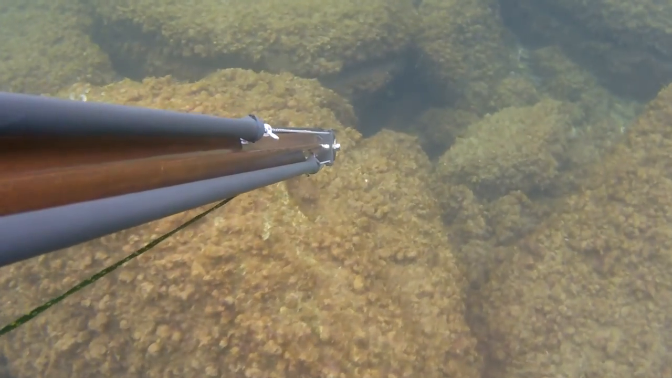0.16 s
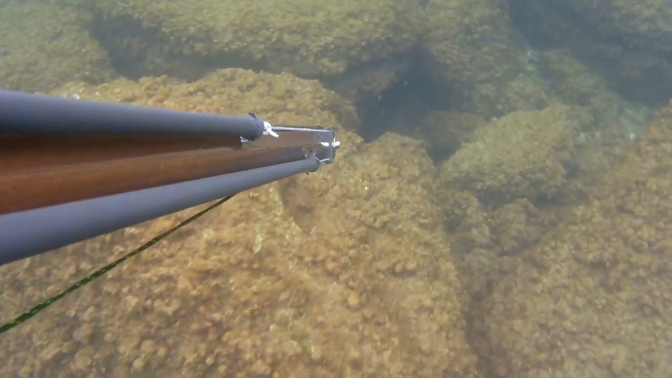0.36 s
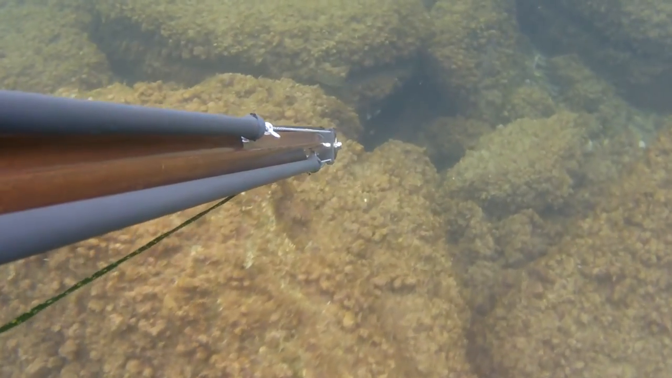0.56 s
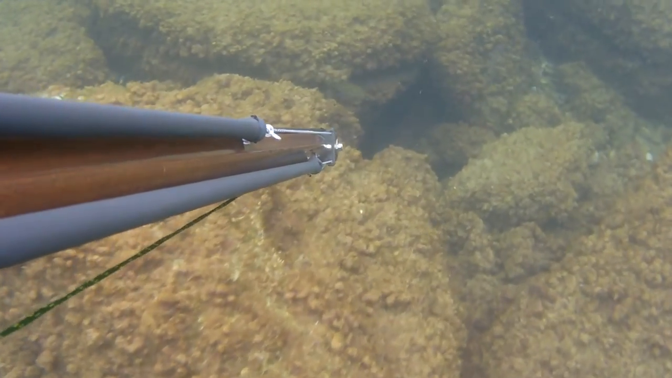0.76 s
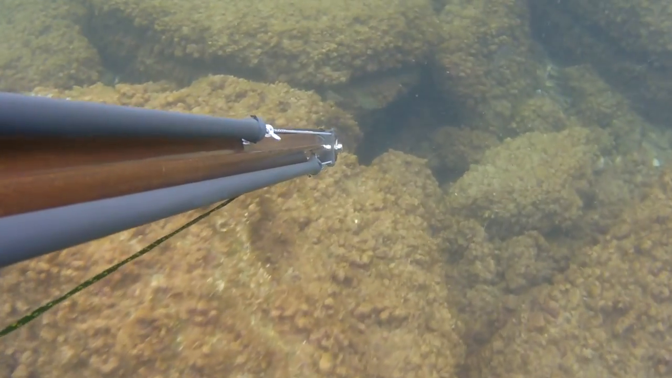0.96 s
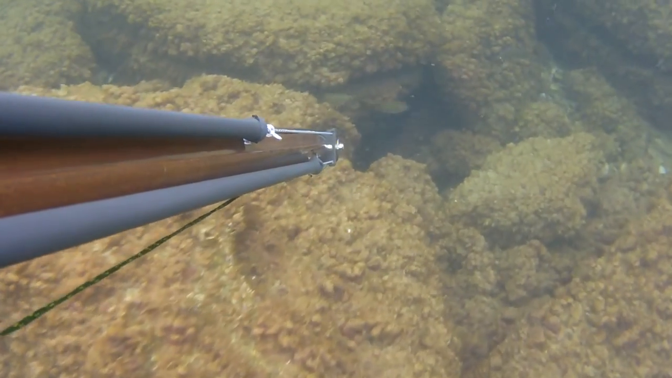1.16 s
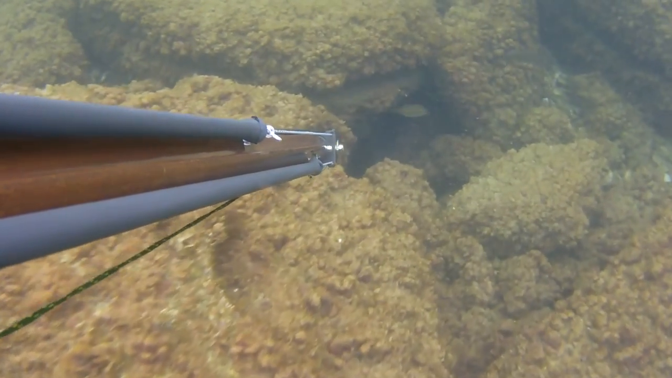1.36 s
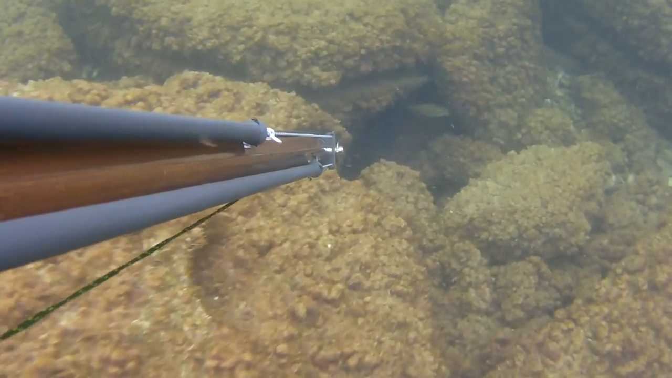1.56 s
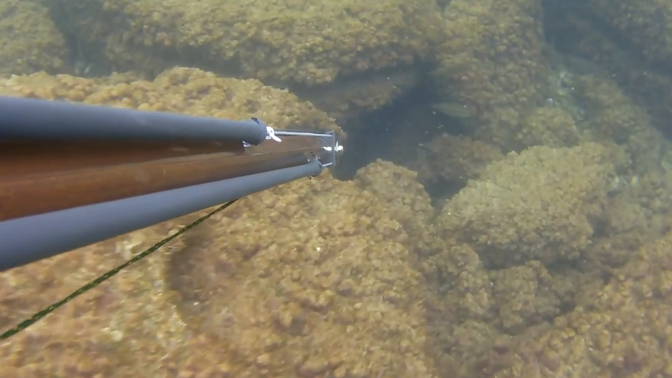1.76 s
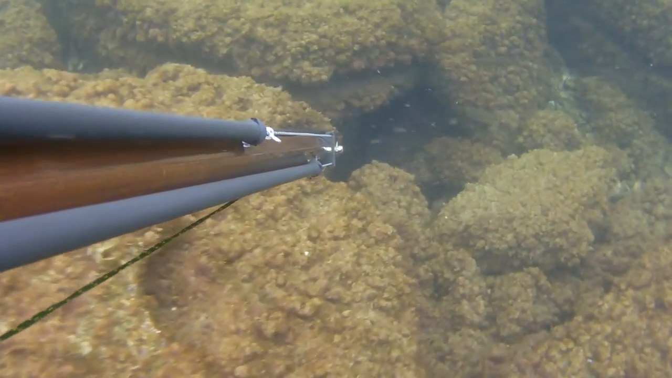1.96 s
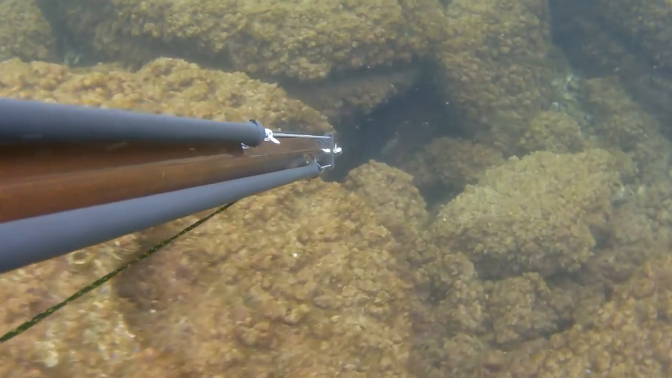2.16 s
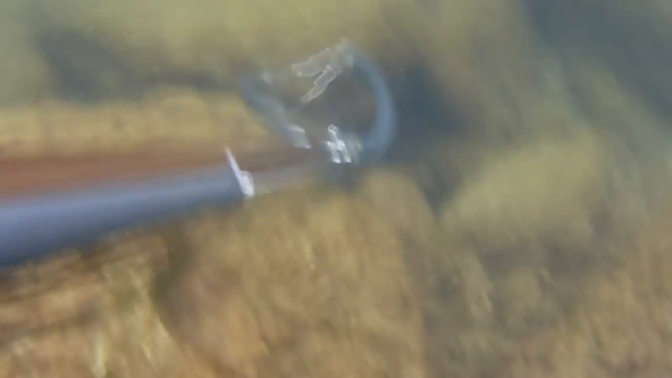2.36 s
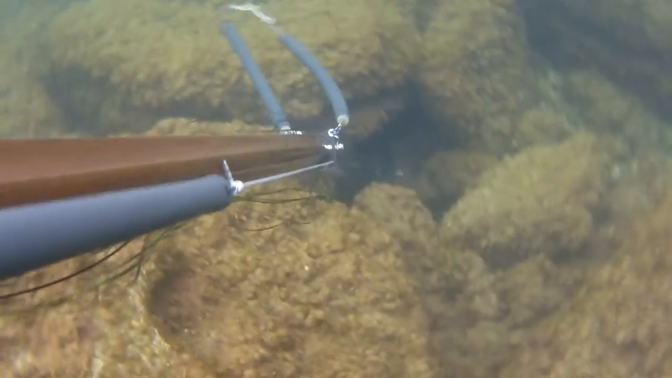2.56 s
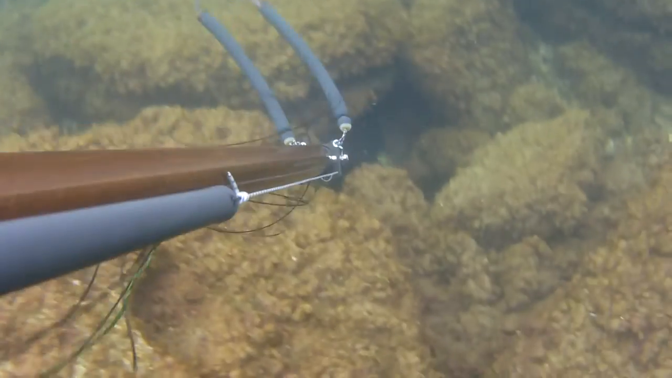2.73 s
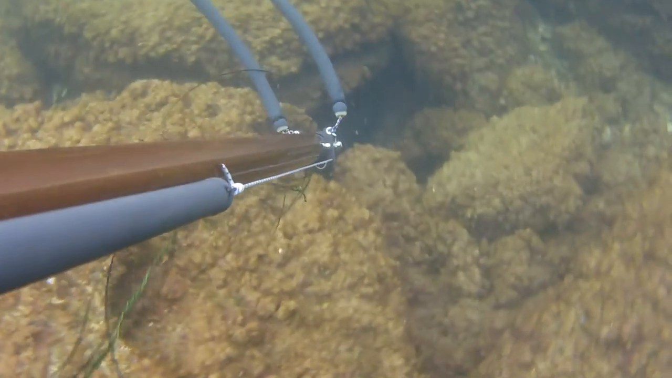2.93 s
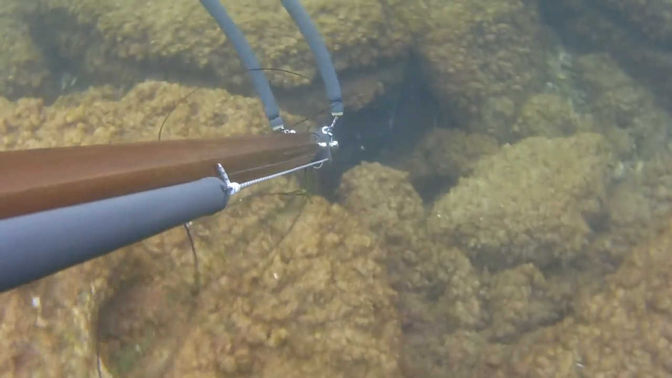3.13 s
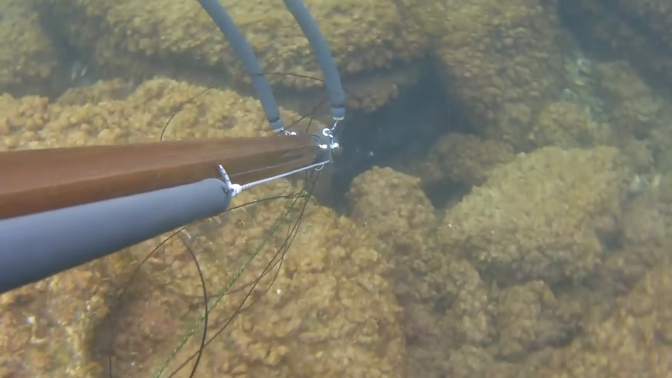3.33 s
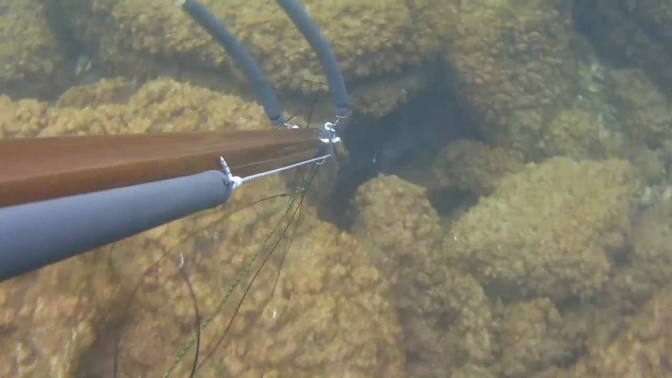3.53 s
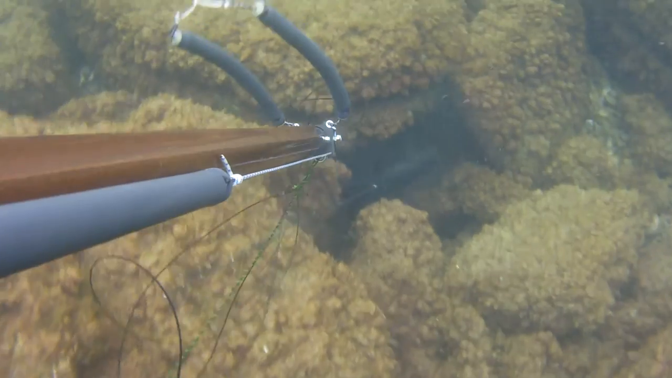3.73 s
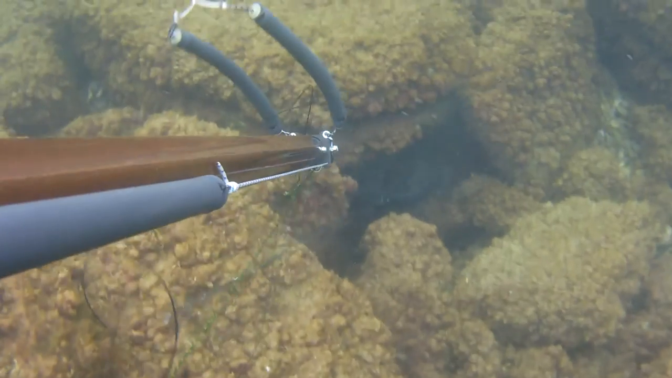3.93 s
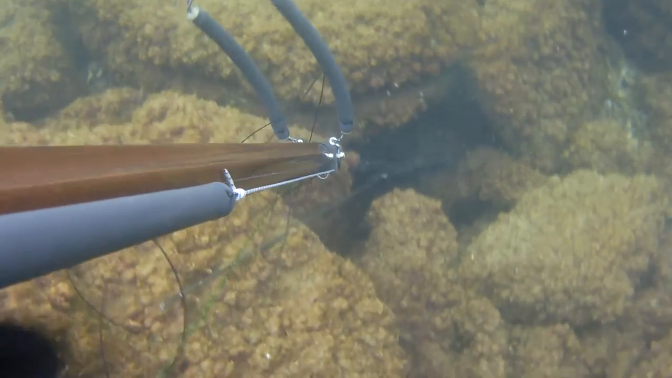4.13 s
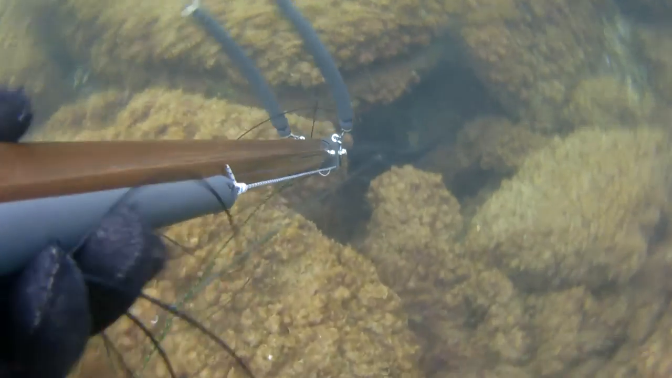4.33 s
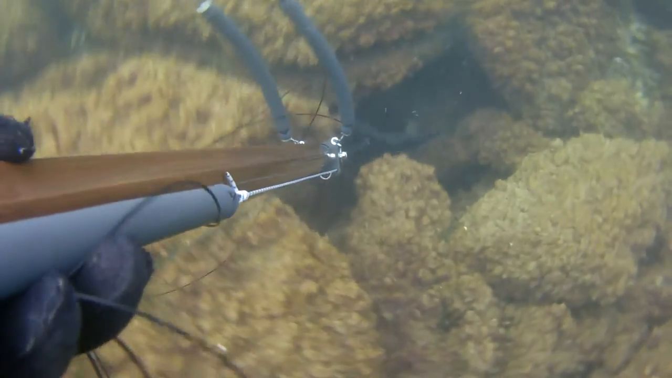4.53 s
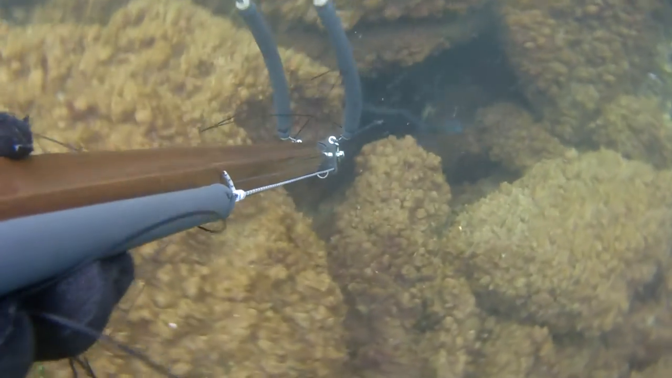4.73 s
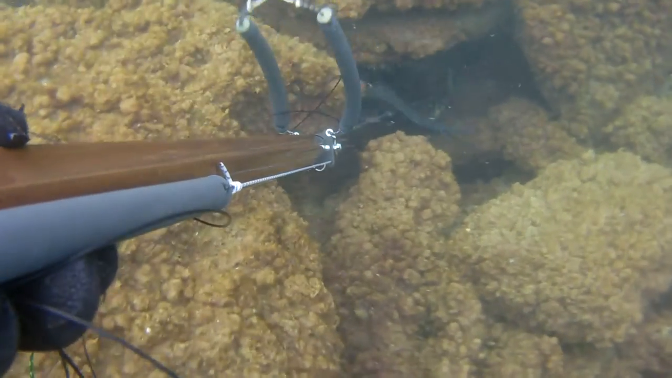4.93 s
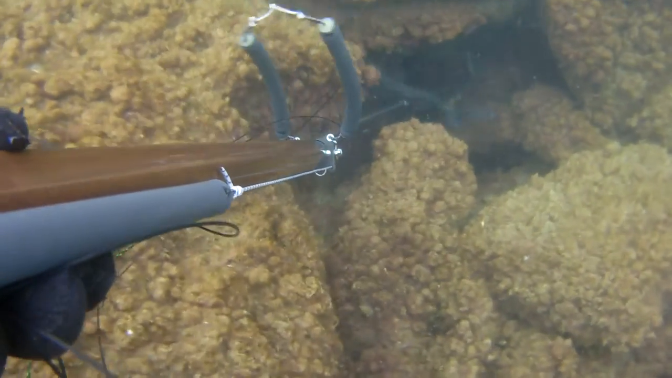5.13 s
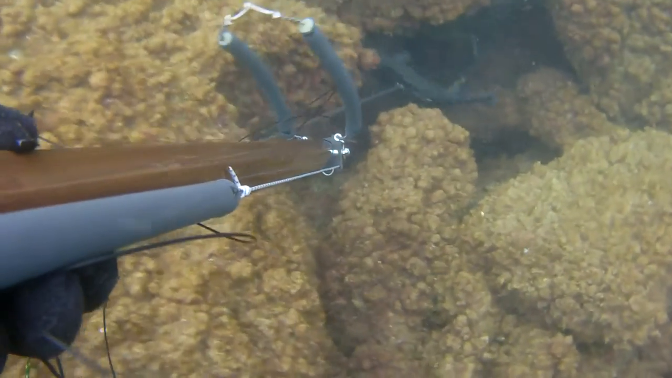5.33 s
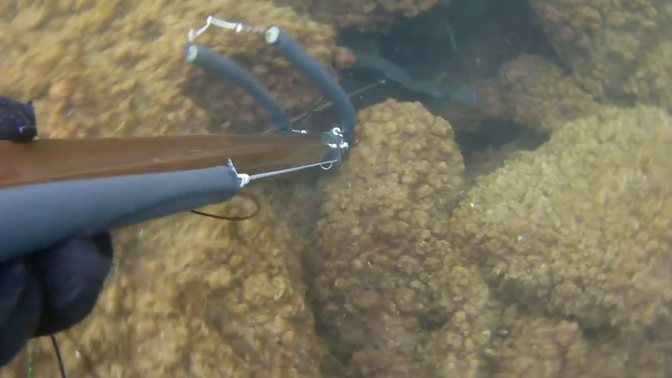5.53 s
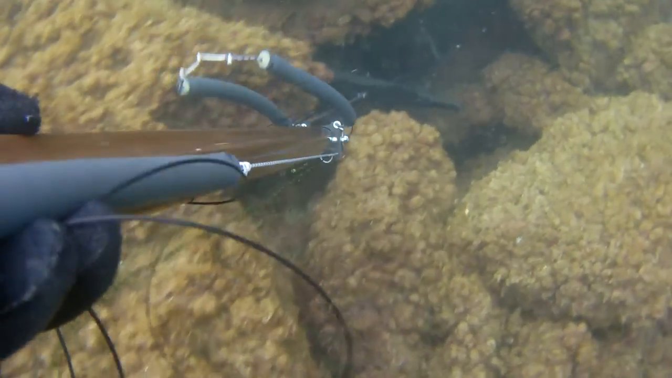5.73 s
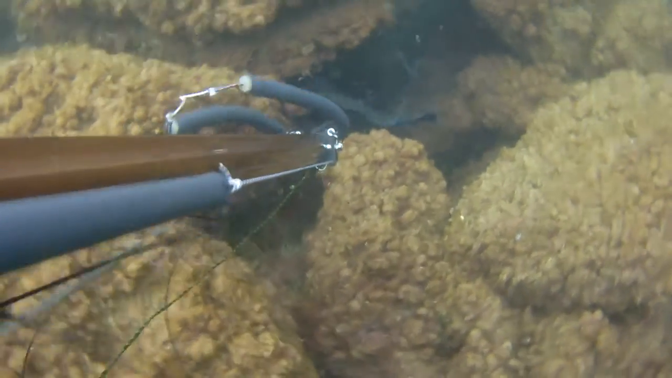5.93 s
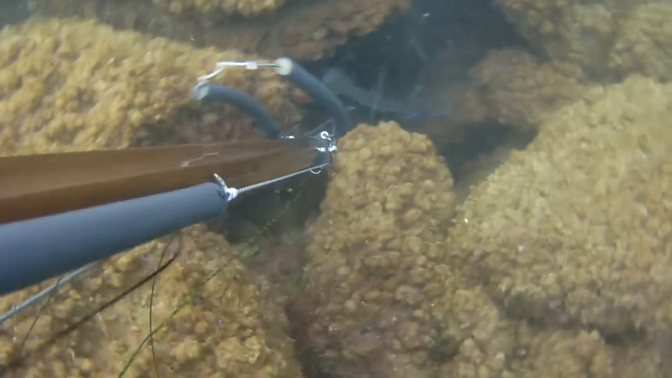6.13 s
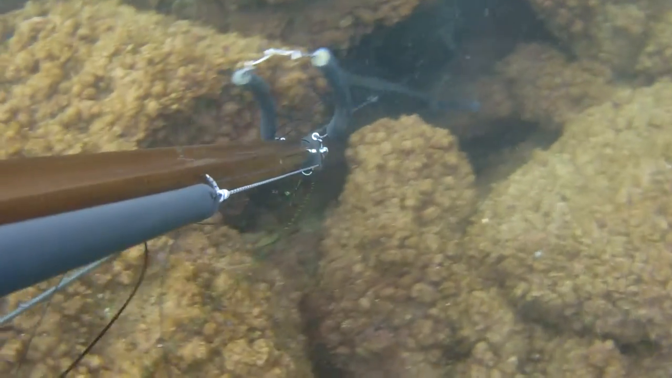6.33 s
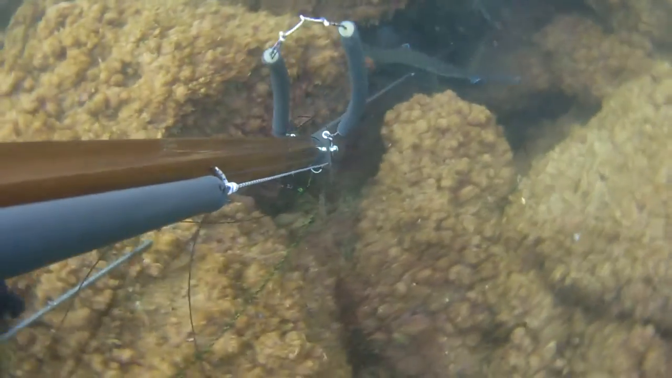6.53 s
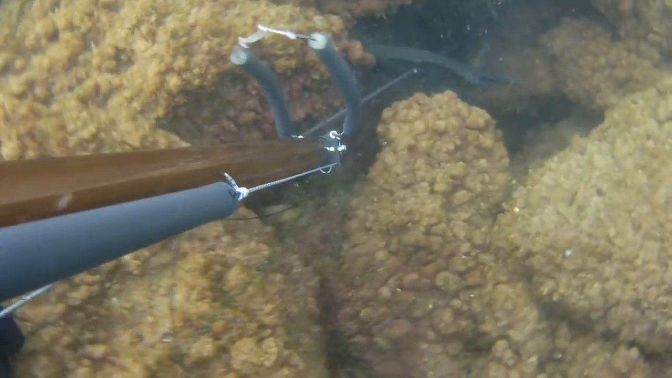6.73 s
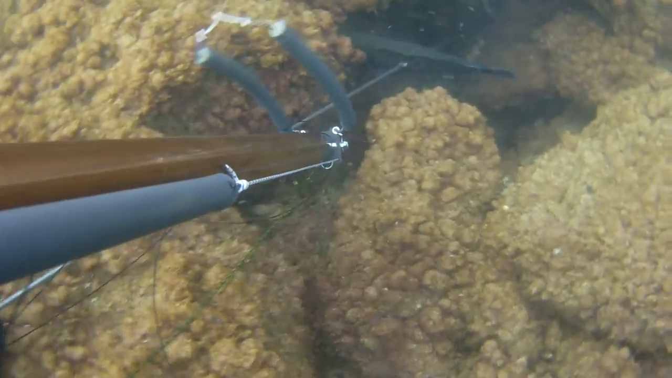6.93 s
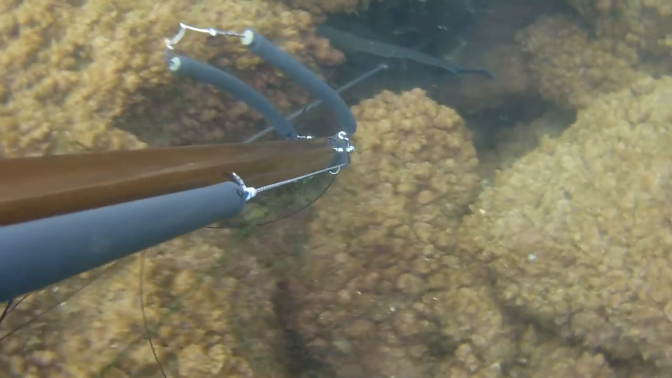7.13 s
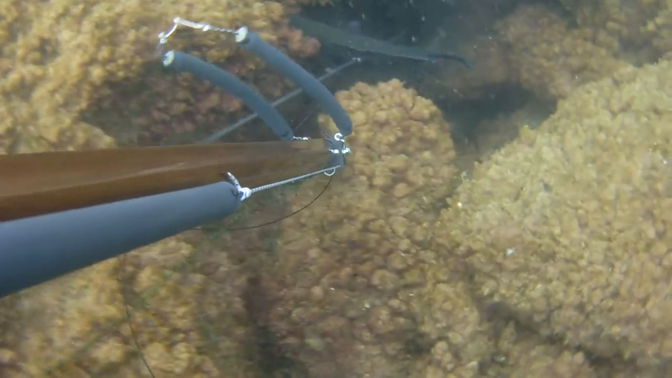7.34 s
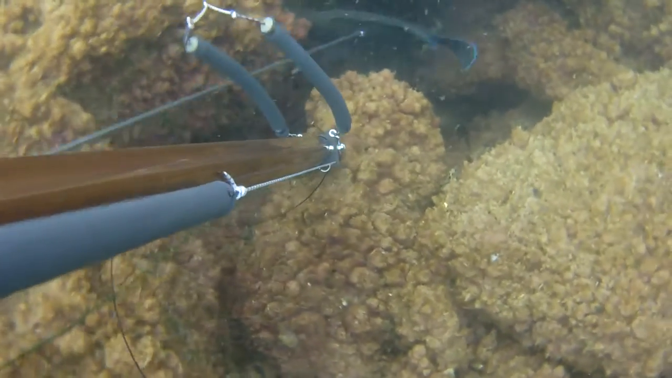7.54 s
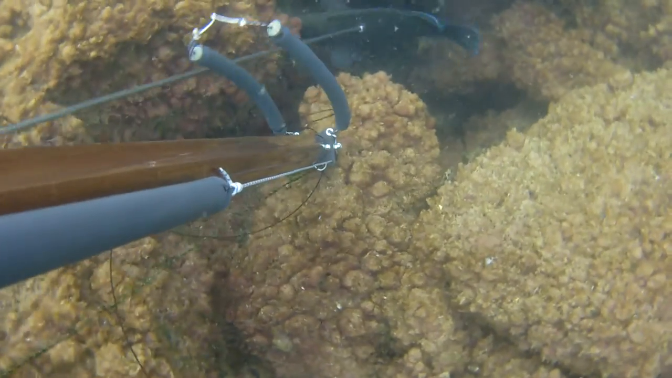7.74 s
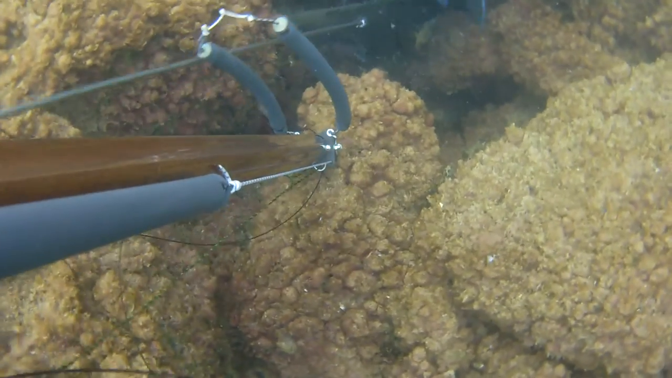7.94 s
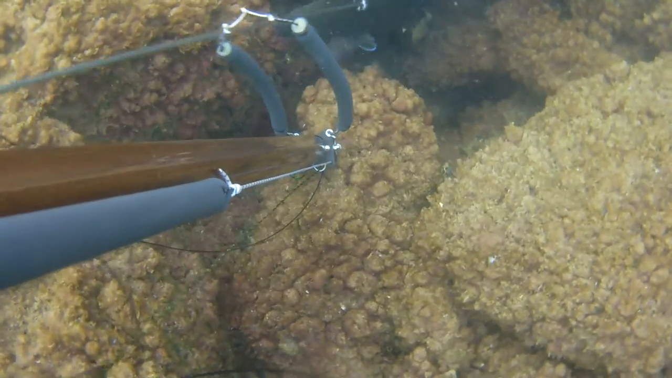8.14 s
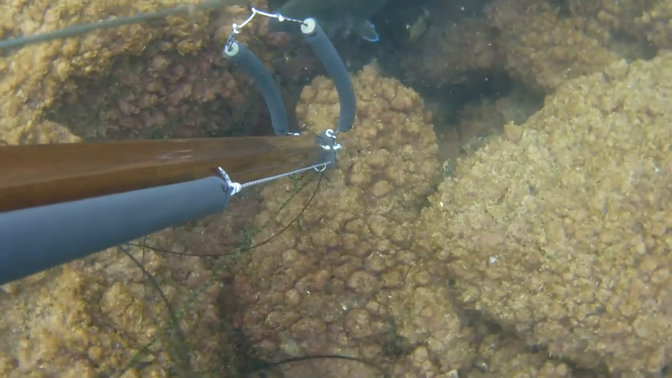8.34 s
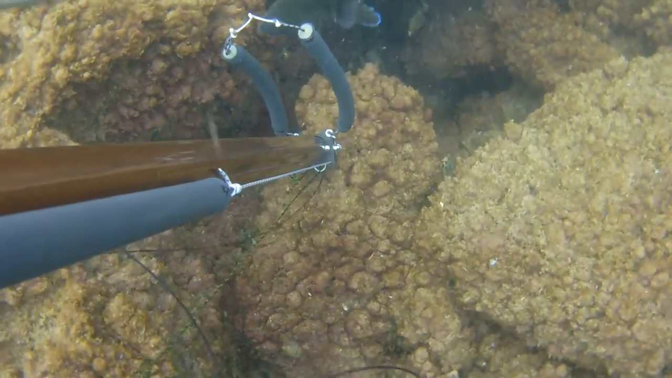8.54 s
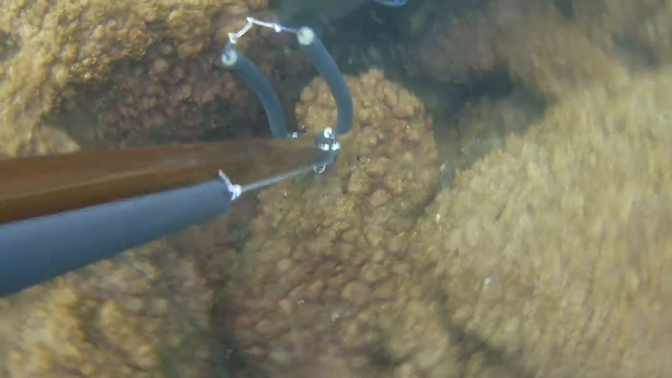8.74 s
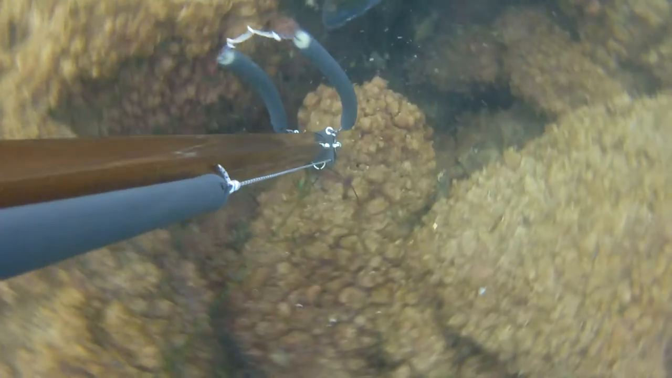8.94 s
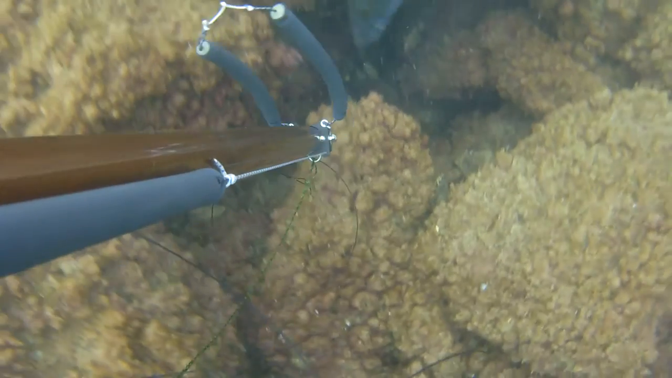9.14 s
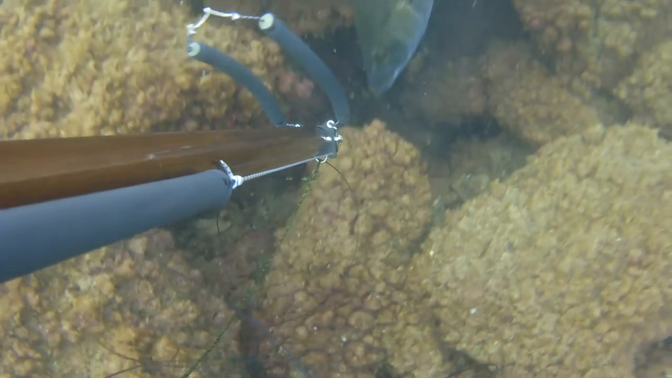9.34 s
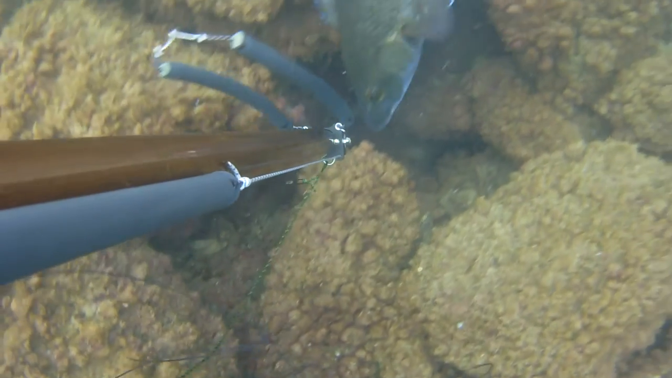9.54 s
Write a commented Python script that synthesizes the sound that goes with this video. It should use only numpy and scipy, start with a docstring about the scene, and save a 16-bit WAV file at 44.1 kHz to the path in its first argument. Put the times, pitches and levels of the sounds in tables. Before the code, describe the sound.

Under shallow water among boulders, dry shrimp snaps fry steadily over a faint wash. After two quiet seconds a band-powered speargun goes off very close, distorting the microphone with a rattling crack and deep recoil. Small ringing spear clinks and slipping line follow. Then come sparse handling bumps, low wobbling thuds, rubs, and strong knocks on the gun, all close and boxy.

```python
"""Speargun shot on a rocky shore

Under water, a microphone in a stiff case on a band-powered speargun hears shrimp crackle all around.
The gun fires and overloads the input, the line runs out, the spear clinks among the rocks, and a hand
and the line rub and knock on the stock. Bursts of noise are the snaps, knocks and rubs; damped tones
are the ringing case, gun and spear; filtered noise is the sea; slow sine waves are sway and recoil."""
import sys
import numpy as np
from scipy import signal
from scipy.fft import rfft, irfft, next_fast_len
from scipy.io import wavfile

SR = 44100
rng = np.random.default_rng(int(sys.argv[2]) if len(sys.argv) > 2 else 0)


def wav_out(sig):
    """Save sig, one row per channel (or a flat mono array), as 16-bit PCM at SR to the path in sys.argv[1]."""
    wavfile.write(sys.argv[1], SR, np.round(np.clip(np.atleast_2d(sig).T, -1, 1) * 32767).astype(np.int16))


N = 422919
TIME = np.arange(N) / SR   # seconds
SHORT = TIME[:4096]


def from_db(db):
    """Decibels to gain."""
    return 10 ** (np.asarray(db) / 20)


def rms_one(x):
    """Scale to unit power."""
    return x / np.sqrt(np.mean(x ** 2) + 1e-20)


def band(x, low_hz, high_hz, order):
    """Keep only the pitches between two limits (Butterworth band-pass)."""
    limits_hz = [low_hz, min(high_hz, .45 * SR)]
    return signal.sosfilt(signal.butter(order, limits_hz, "band", fs=SR, output="sos"), x)


def add(out, start_s, sound):
    """Mix a sound in from a given time."""
    at = max(round(start_s * SR), 0)
    out[at:at + len(sound)] += sound[:N - at]


def drift(per_s, t=TIME):
    """Random wandering: straight lines between per_s new chance values a second."""
    return np.interp(t * per_s, np.arange(2000), rng.standard_normal(2000))


def envelope(start_s, attack_s, hold_s, decay_s):
    """Rise in a straight line, hold until hold_s after the start, then die away."""
    t = TIME - start_s
    return np.clip(t / attack_s, 0, 1) * np.exp(-np.maximum(t - hold_s, 0) / decay_s)


def swing(hz, wander):
    """A slow pressure swing of unsteady pace, unit power."""
    return np.sqrt(2) * np.sin(2 * np.pi * hz * TIME + wander * drift(60))


def ringing(modes):
    """A body's answer to one click: damped tones of alternating sign, unit energy."""
    t = TIME[:8192]
    answer = np.zeros(len(t))
    for k, (hz, width, db) in enumerate(modes):
        fade = width * np.exp(-np.pi * width * t)   # a wider mode dies away sooner
        answer += (-1) ** k * from_db(db) * fade * np.cos(2 * np.pi * hz * t)
    return answer / np.linalg.norm(answer)


def through(x, answer):
    """Play a force through a body."""
    return signal.fftconvolve(x, answer)[:len(x)]


def at_level(sound, db):
    """Set the average (rms) level of a tick's first 12 ms."""
    return from_db(db) * sound / np.sqrt(np.mean(sound[..., :530] ** 2, axis=-1, keepdims=True))


def cracks(count, crack_s, scatter_db, scatter_s):
    """Sharp noise cracks, each with a slower-fading tail of scatter from the rocks."""
    t = SHORT[:2048]
    shape = np.exp(-t / crack_s) + from_db(scatter_db) * np.exp(-t / scatter_s)
    return rng.standard_normal((count, len(t))) * shape


# colour of the sea's wash: (frequency [Hz], relative level per Hz [dB])
SEA_COLOUR = [(20, 0), (32, 14.5), (50, -1), (80, -1), (200, 0.5), (400, -2.5), (560, -4), (665, -1),
              (760, -8.5), (1100, -9), (2000, -31), (6000, -24.5), (16000, -29)]


def sea():
    """A soft, steady wash of water: noise coloured by frequency."""
    size = next_fast_len(N)
    hz, db = np.transpose(SEA_COLOUR)
    freqs = np.maximum(np.fft.rfftfreq(size, 1 / SR), 1)
    colour = from_db(np.interp(np.log(freqs), np.log(hz), db))
    return rms_one(irfft(rfft(rng.standard_normal(size)) * colour, size)[:N])


# ringing of the case as the water strikes it: (frequency [Hz], width [Hz], relative level [dB])
HOUSING_MODES = [(1316, 75, 7), (1410, 151, 6.5), (1768, 90, 12.5), (2097, 125, 3), (2303, 32, 4.5),
                 (2801, 137, 9.5), (3204, 132, 7), (3666, 256, 4), (4640, 230, 5), (5353, 220, 5.5),
                 (6130, 520, -3.5), (7230, 450, -6.5), (8300, 730, -11.5), (9520, 127, -1),
                 (10300, 200, -7), (12700, 500, -27), (14100, 1500, -65)]


def housing(uneven_db=0):
    """The stiff case lets little through below its first mode; uneven_db varies the modes by chance."""
    modes = [(hz, width, db + uneven_db * rng.normal()) for hz, width, db in HOUSING_MODES]
    return band(ringing(modes)[:2048], 1200, 18000, order=3)


def far_colony(flutter_db=3.5, dull_hz=7000):
    """Countless distant snaps merge into a dull frying hiss, made of fluttering noise."""
    hiss = rng.standard_normal(N) * from_db(flutter_db * drift(130))
    return rms_one(band(through(hiss, housing()), 300, dull_hz, order=1))


def colony(per_s=100, spread_db=5.0, octaves=1.0, top_hz=11000):
    """Shrimp all over the reef snap at random; each patch of rock has its own echo and brightness."""
    patches = []
    for path in cracks(count=48, crack_s=0.00041, scatter_db=5, scatter_s=0.0043):
        centre_hz = np.clip(3600 * 2 ** (octaves * rng.normal()), 1500, 8000)
        heard = through(path, housing(uneven_db=2.5))
        patches.append(at_level(band(heard, centre_hz / 2, centre_hz * 2, order=1), 0))
    out = np.zeros(N)
    for when, size, pick in rng.random((int(per_s * N / SR), 3)):
        gain = from_db(-spread_db * np.log(size + 0.039))   # many weak snaps, few strong ones
        add(out, when * N / SR, gain * patches[int(pick * len(patches))])
    return band(out, 500, top_hz, order=1)


def ticks(per_s=40, level_db=-66, spread_db=3.5, low_hz=6000, top_hz=10500):
    """Tiny snaps close to the case arrive thin and bright, without its ringing."""
    bursts = cracks(count=24, crack_s=0.0021, scatter_db=-13, scatter_s=0.0046)
    shapes = at_level(band(bursts, low_hz, top_hz, order=2), level_db)
    out = np.zeros(N)
    for when, size, pick in rng.random((int(per_s * N / SR), 3)):
        gain = from_db(-spread_db * np.log(size + 0.013))
        add(out, when * N / SR, gain * shapes[int(pick * len(shapes))])
    return out


# snaps of the nearest shrimp: (time [s], level [dB], brightness [dB])
# brightness is added to the high part and taken from the low part
NEAR_SNAPS = [(0.582, -48.5, -9.5), (0.6882, -47.5, 2), (0.806, -55, 21.5), (0.8924, -37.5, 0),
              (1.027, -44.5, 4.5), (1.3774, -49.5, -10), (1.46, -47, -3.5), (1.989, -44.5, 1),
              (2.084, -38, 6.5), (2.168, -48.5, -2), (2.1795, -47.5, 16), (2.6502, -44.5, 4),
              (2.7448, -38.5, -3), (2.787, -43.5, 3), (2.8437, -43, -0.5), (3.348, -33.5, 4.5),
              (3.606, -34.5, 2.5), (3.9456, -53.5, 24), (4.046, -40.5, 3.5), (4.4574, -52, -8),
              (4.6556, -35, 4), (5.06, -46, -0.5), (5.1902, -38.5, 4), (5.4963, -41.5, 1), (5.569, -43, 0),
              (5.6629, -44, -10.5), (5.675, -34, 4), (5.8557, -44.5, 9), (6.0158, -36.0, 4),
              (6.151, -42, 2), (6.559, -41, -2.5), (7.0831, -24, 2), (7.537, -40, 1.5), (7.6458, -40, 0),
              (7.9694, -44.5, 2), (8.1594, -40.5, -2), (8.2418, -44, 6.5), (8.521, -41.5, 5),
              (8.976, -42, 5.5), (9.257, -59, -10), (9.392, -41.5, 1.5)]


def near_shrimp(ring_db=4.0, body_db=4.0, sparkle_db=-10.0, direct_db=-11):
    """Each claw snap jolts the case and rings its low, middle and high modes, tilted by its brightness."""
    start_s, db, bright = np.array(NEAR_SNAPS, float).T[:, :, None]
    force = cracks(len(start_s), crack_s=0.00053, scatter_db=-12, scatter_s=0.0069)
    snaps = signal.lfilter(housing(), [1], force) + from_db(direct_db) * force
    low = at_level(band(snaps, 1200, 2400, order=3), db - bright + ring_db)
    middle = at_level(band(snaps, 2300, 6500, order=2), db + body_db)
    high = at_level(band(snaps, 6700, 15000, order=2), db + bright + sparkle_db)
    out = np.zeros(N)
    for start, snap in zip(start_s[:, 0], low + middle + high):
        add(out, start, snap)
    return out


# faint hollow blips: (time [s], level [dB])
BLIP_TIMES = [(.07, -52.5), (1.105, -58), (1.31, -57.5)]
# the ring of the blips: (frequency [Hz], width [Hz], relative level [dB])
HOLLOW_MODES = [(669, 13, 0)]


def blips(swell_s=0.0096):
    """Soft, hollow notes in the water before the shot: swelling noise pushes one narrow mode."""
    out, hollow = np.zeros(N), band(ringing(HOLLOW_MODES), 500, 900, order=2)
    for start_s, db in BLIP_TIMES:
        push = rng.standard_normal(len(SHORT)) * SHORT * np.exp(-SHORT / swell_s)
        add(out, start_s, from_db(db) * rms_one(through(push, hollow)))
    return out


# nudges that set the long gun swaying and shove water past the case:
# (time [s], sway level before sway's level_db [dB], shove level [dB])
GUN_NUDGES = [(3.6, -44, -66), (4.12, -42.5, -63), (4.31, -37.5, -43), (5.62, -40.5, -38),
              (5.82, -36, -38.5), (6.589, -38.5, -58), (7.57, -39.5, -51), (8.73, -36, -30)]


def sway(sway_hz=30.5, rise_s=0.027, decay_s=0.18, wander=1.0, level_db=5.5):
    """After each nudge the gun flexes at its lowest bending mode and settles."""
    power, t = np.zeros(N), TIME[:SR]
    for start_s, db, _ in GUN_NUDGES:
        strength = from_db(db + level_db) * (1 - np.exp(-t / rise_s)) * np.exp(-t / decay_s)
        add(power, start_s, strength ** 2)
    return np.sqrt(power) * np.sin(2 * np.pi * sway_hz * TIME + wander * drift(12))


FIRE_S = 2.2645   # the moment of the shot
KICK_DB, KICK_HZ, KICK_RISE_S, KICK_HOLD_S, KICK_DECAY_S = 0, 33.3, 0.015, 0.04, 0.064
FLAP_DB, FLAP_HZ, FLAP_RISE_S, FLAP_HOLD_S, FLAP_DECAY_S = -2, 56.24, 0.056, 0.075, 0.052
# each shove swells and fades around a moment just after its nudge
SHOVE_HZ, SHOVE_LAG_S, SHOVE_HALF_S = 59.3, 0.063, 0.041


def recoil(wander=0.63):
    """Slow pressure swings as the gun kicks, its bands flap and the hand shifts it."""
    kick = from_db(KICK_DB) * envelope(FIRE_S, KICK_RISE_S, KICK_HOLD_S, KICK_DECAY_S)
    flap = from_db(FLAP_DB) * envelope(FIRE_S, FLAP_RISE_S, FLAP_HOLD_S, FLAP_DECAY_S)
    shoves = np.zeros(N)
    for nudge_s, _, db in GUN_NUDGES:
        shoves += from_db(db) * np.exp(-.5 * ((TIME - nudge_s - SHOVE_LAG_S) / SHOVE_HALF_S) ** 2)
    return kick * swing(KICK_HZ, wander) + flap * swing(FLAP_HZ, wander) + shoves * swing(SHOVE_HZ, wander=1.3)


# tugs that draw the line out: (time [s], level [dB], decay [s])
LINE_TUGS = [(2.55, -39, 0.29), (3.13, -44.5, 0.39), (4.15, -51.5, 0.49)]
# what the running line sets ringing: (frequency [Hz], width [Hz], relative level [dB])
LINE_MODES = [(576, 230, -1), (658, 41, 6.5), (1040, 13, -1), (1377, 17, 6.5), (1570, 310, -2.5),
              (1815, 39, 4)]


def line(slips_per_s=50, slip_s=0.0041, glide=0.28, tug_rise_s=0.046, tug_hold_s=0.13):
    """After each tug the line slips out in little jerks over a faint glide and makes the muzzle sing."""
    jerks = (rng.random(N) < slips_per_s / SR) * rng.uniform(.5, 1.5, N)
    # each jerk dies away over slip_s; the tiny offset keeps the filter from stalling
    pull = glide + signal.lfilter([1], [1, -np.exp(-1 / (slip_s * SR))], jerks + 1e-18)
    song = band(through(pull * rng.standard_normal(N), ringing(LINE_MODES)), 400, 2100, order=2)
    power = np.zeros(N)
    for start_s, db, decay_s in LINE_TUGS:
        power += (from_db(db) * envelope(start_s, tug_rise_s, tug_hold_s, decay_s)) ** 2
    return np.sqrt(power) * rms_one(song)


# the spear touching rock: (time [s], level before spear's level_db [dB])
SPEAR_CLINKS = [(3.2087, -31), (3.3338, -25), (3.4426, -16.5), (3.5963, -25), (3.8027, -26.5), (3.894, -32),
                (3.9694, -19.5), (4.1769, -15), (4.2058, -21), (4.4045, -19), (4.5293, -27)]
# what the spear rings with: (frequency [Hz], width [Hz], relative level [dB])
SPEAR_MODES = [(1320, 27, 7.5), (1580, 63, 4), (1580, 210, 3), (1805, 47, 12), (1986, 49, 2.5)]


def spear(level_db=-9.0, scuff_s=0.00082, rattle_db=-23, rattle_s=0.014,
          bounce_s=0.034, bounce_db=-13, grit_db=-22):
    """The shaft scuffs grittily on rock out in the hole, rings briefly and bounces once."""
    out, shaft = np.zeros(N), band(ringing(SPEAR_MODES), 1220, 2150, order=5)
    pressure = SHORT / scuff_s * np.exp(-SHORT / scuff_s) + from_db(rattle_db) * np.exp(-SHORT / rattle_s)
    for start_s, db in SPEAR_CLINKS:
        first_db = db + level_db
        again_s = start_s + bounce_s * rng.uniform(.85, 1.15)
        for at_s, touch_db in [(start_s, first_db), (again_s, first_db + bounce_db)]:
            scuff = pressure * rng.standard_normal(len(SHORT))
            grit = band(scuff, 2500, 5600, order=2)
            add(out, at_s, at_level(through(scuff, shaft), touch_db) + at_level(grit, touch_db + grit_db))
    return out


# ringing of stock, spear and mount together: (frequency [Hz], width [Hz], relative level [dB])
GUN_MODES = [(75, 35, -25), (145, 117, -1.5), (266, 17, 2.5), (323, 34, 0), (445, 110, -5),
             (504.4, 22.6, 4.5), (657.7, 30.4, 1), (805.8, 23, 3.5), (887.4, 24, -8), (1005.6, 68, -3),
             (1307, 46, -6.5), (1512, 110, -3), (1746, 44, 1), (1781, 31, -2), (2036, 153, -8.5),
             (3005, 520, -8.5), (3260, 1500, -14.5), (4630, 1150, -14.5), (9100, 16700, -30)]


def gun_body():
    """Stock, spear and mount ring together when shaken."""
    return ringing(GUN_MODES)


def contact(force, pitch_hz, body, breadth=1.71, grit_db=5.0, scratch_db=-11):
    """A gritty contact shakes the gun around its own pitch, with a faint scratch above, as strong as its force."""
    roughness = np.minimum(rng.exponential(1, len(force)), 5)
    grains = rng.standard_normal(len(force)) * from_db(grit_db * roughness)
    low_hz, high_hz = pitch_hz / max(breadth, 1.1), pitch_hz * max(breadth, 1.1)
    scratch = from_db(scratch_db) * band(grains, high_hz, 2 * high_hz, order=1)
    shake = band(grains, low_hz, high_hz, order=2) + scratch
    sound = signal.fftconvolve(shake * force, body)
    return sound * np.linalg.norm(force) / np.linalg.norm(sound)


# blows on the gun: release, bands and wishbone, later knocks:
# (time [s], level [dB], decay [s], contact pitch [Hz])
GUN_BLOWS = [(2.267, 6, 0.013, 1650), (2.382, 5, 0.0094, 1690), (2.438, -5.5, 0.0033, 1370),
             (5.640, -25.5, 0.0017, 463), (5.903, -25.5, 0.0039, 560), (5.928, -24, 0.0014, 327),
             (6.573, -8.5, 0.012, 1060), (6.579, -14.5, 0.01, 1730), (7.478, -21, 0.003, 2820),
             (7.850, -28.5, 0.01, 516), (8.777, -5.5, 0.013, 914), (8.783, -13, 0.013, 230)]
# shaft, hand and line rubbing along the gun:
# (time of the middle [s], level [dB], half length [s], pitch [Hz])
GUN_RUBS = [(2.5, -21, 0.016, 1000), (4.358, -39, .023, 390), (5.854, -43.5, 0.029, 425),
            (7.53, -38, 0.035, 835), (7.653, -29, 0.0097, 865), (8.447, -43.5, 0.02, 1000),
            (8.588, -39.5, 0.038, 1030), (8.736, -24, 0.025, 830)]


def gun(rattle_db=-23.5, rattle_s=0.033, catch_db=4.0, rasp_db=-9, rasp_hz=2700):
    """Blows start at once and die away in a rattle; rubs swell and fade, catching unevenly, with a rasp."""
    out, body, t = np.zeros(N), gun_body(), TIME[:16384]
    for start_s, db, decay_s, pitch_hz in GUN_BLOWS:
        force = np.exp(-t / decay_s) + from_db(rattle_db) * np.exp(-t / rattle_s)
        add(out, start_s, contact(from_db(db) * force, pitch_hz, body))
    for middle_s, db, half_s, pitch_hz in GUN_RUBS:
        catching = rms_one(from_db(catch_db * drift(289.7, t)))
        # a bell-shaped swell that peaks pi half lengths after it starts
        force = from_db(db) * np.exp(-.5 * (t / half_s - np.pi) ** 2) * catching
        rasp_force = force * catching * from_db(rasp_db) * pitch_hz / rasp_hz
        rasp = contact(rasp_force, rasp_hz, body, breadth=1.45, grit_db=10.0)
        rub = contact(force, pitch_hz, body, breadth=2.0, grit_db=7.0)
        add(out, middle_s - np.pi * half_s, rub + rasp)
    return out


def shot(level_db=4, pitch_hz=617, attack_s=0.00051, drive_s=0.092, settle_s=0.028,
         judder_db=3.5, judders_per_s=110):
    """The bands drive the spear juddering down its track at full force, then thrash and settle."""
    judder = from_db(level_db + judder_db * drift(judders_per_s))
    force = envelope(FIRE_S, attack_s, drive_s, settle_s) * judder
    return contact(force, pitch_hz, gun_body(), breadth=2.6, grit_db=3.0, scratch_db=-11)[:N]


def scene():
    """Reef and gun, as they reach the one microphone."""
    water = from_db(-53.5) * sea() + blips()
    crackle = from_db(-57.5) * far_colony() + from_db(-58) * colony()
    shrimp = crackle + ticks() + near_shrimp()
    speargun = sway() + recoil() + line() + spear() + gun() + shot()
    return (water + shrimp + speargun)[None]


def record(dry, overload=0.32, cutoff_hz=16000):
    """The input stage flattens peaks near the overload level; then the top is cut."""
    clipped = dry / (1 + (dry / overload) ** 8) ** (1 / 8)
    return signal.sosfilt(signal.ellip(10, .1, 80, cutoff_hz, fs=SR, output="sos"), clipped)


dry = scene()
out = record(dry)
wav_out(out)
```